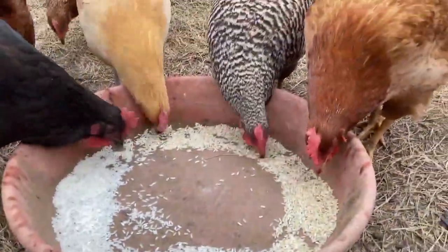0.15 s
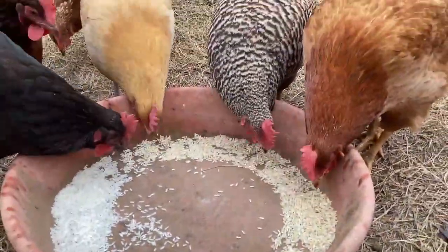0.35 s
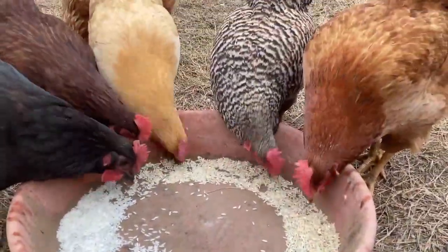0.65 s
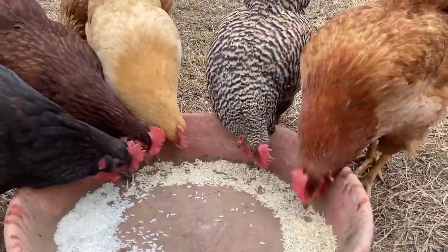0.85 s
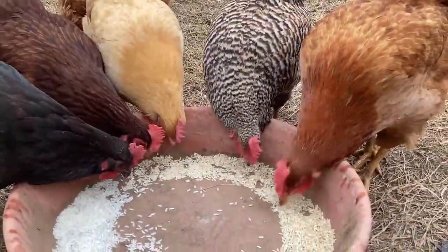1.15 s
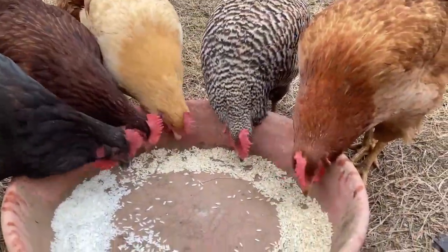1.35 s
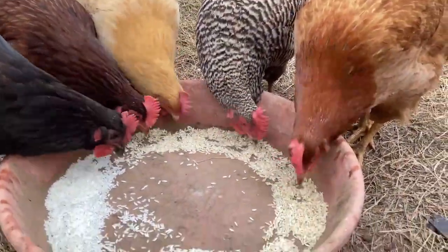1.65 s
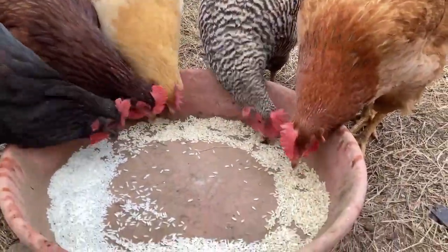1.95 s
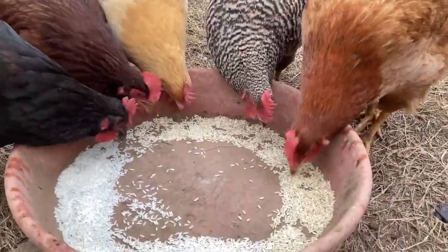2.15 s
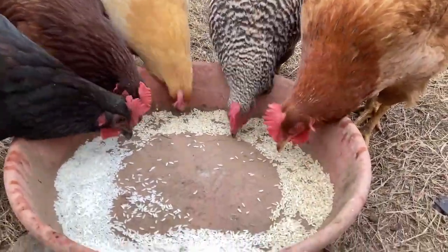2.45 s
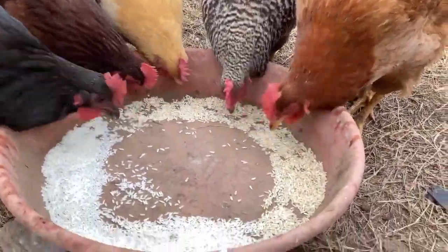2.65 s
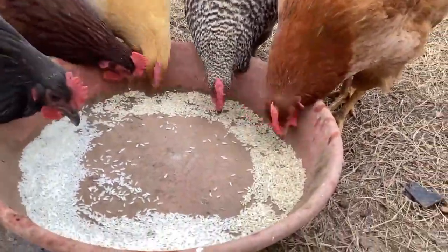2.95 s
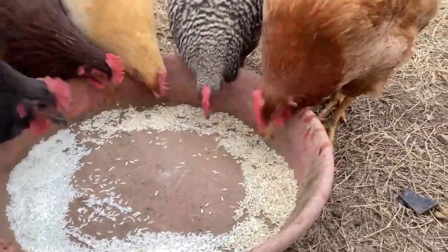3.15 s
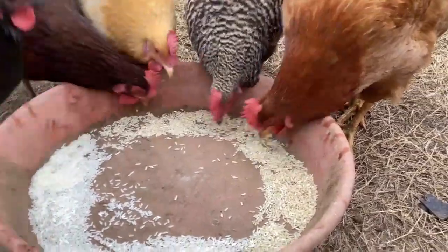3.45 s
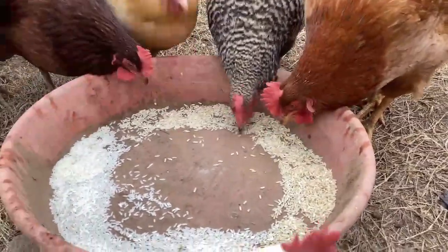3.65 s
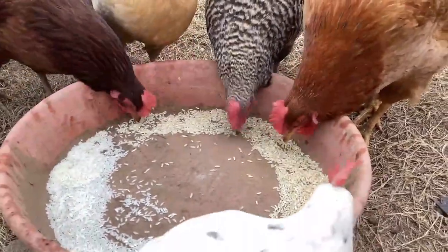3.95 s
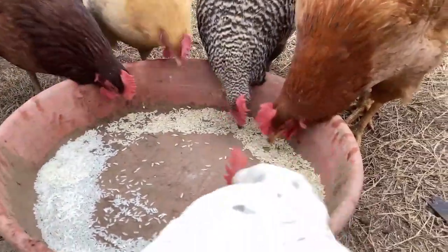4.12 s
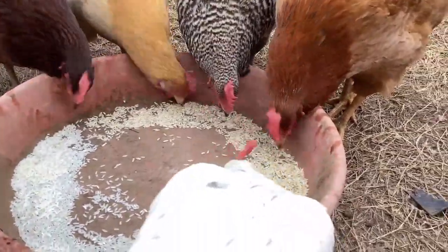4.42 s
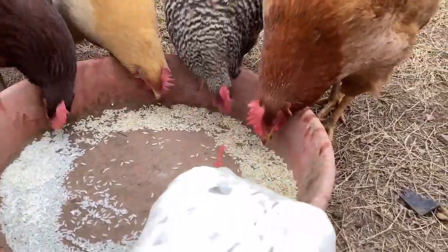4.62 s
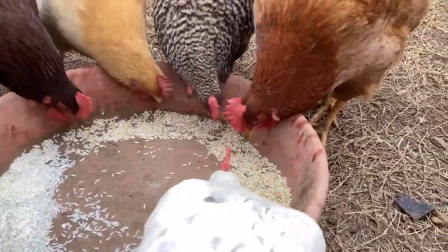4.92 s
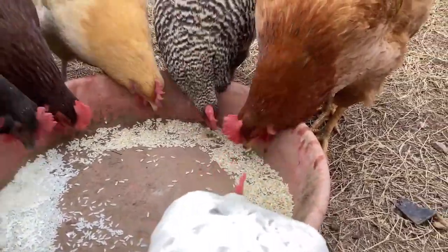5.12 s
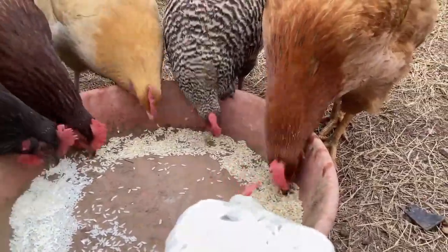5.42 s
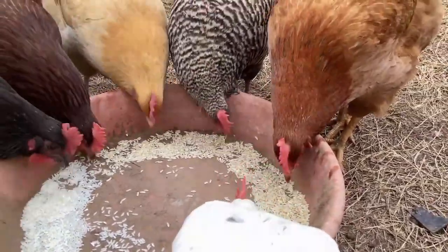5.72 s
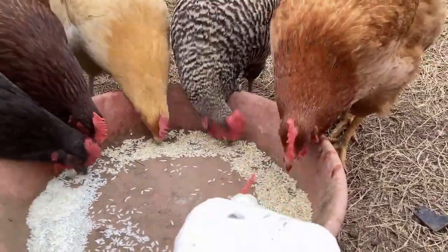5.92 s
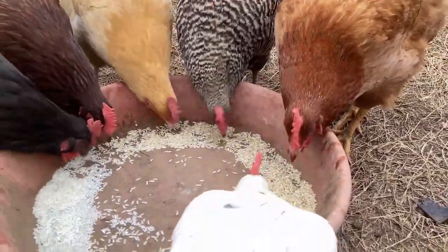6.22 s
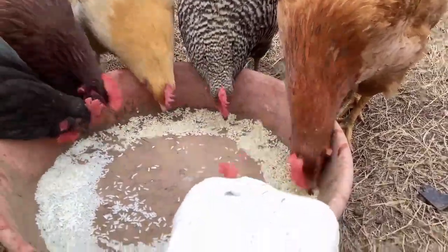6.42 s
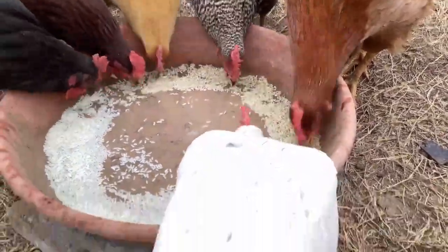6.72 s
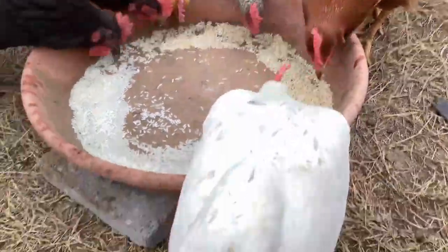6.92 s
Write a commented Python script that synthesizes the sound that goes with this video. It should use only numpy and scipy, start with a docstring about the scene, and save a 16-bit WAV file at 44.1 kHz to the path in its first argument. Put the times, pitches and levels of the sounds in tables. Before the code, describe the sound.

Rapid uneven beak knocks on a thin pan with crisp rice ticking, faint straw rustle and one soft hen murmur, outdoors.

```python
"""Dry rice crunches and a thin pan knocks as hens peck from a wide plastic pan in a backyard, heard from close above.
Each beak drives through the grains and jolts the pan, whose bending waves arrive treble first and end in a low thud.
Kicked grains patter down and loose rice slides back, both as ticking noise; straw and feathers rustle as birds jostle.
One hen murmurs a hoarse gliding tone and a distant bird peeps twice, over a quiet outdoor rumble of shaped noise."""
import sys
import numpy as np
from scipy import signal
from scipy.fft import rfft, irfft, next_fast_len
from scipy.io import wavfile
from scipy.ndimage import uniform_filter1d

SR = 44100
rng = np.random.default_rng(int(sys.argv[2]) if len(sys.argv) > 2 else 0)


def materialize(psi):
    """Save the field psi as 16-bit PCM at rate SR to the path in sys.argv[1].

    A 1-D psi becomes a single channel; in a 2-D psi each row is a channel.
    """
    bounded = np.clip(np.atleast_2d(psi).T, -1, 1)
    quanta = np.round(bounded * 32767).astype(np.int16)
    wavfile.write(sys.argv[1], SR, quanta)


N = 311768
PECK_SIZE = 8192   # samples in the sound of one peck
TIME = np.arange(N) / SR
PECK_TIME = np.arange(PECK_SIZE) / SR
PECK_HZ = np.maximum(np.arange(PECK_SIZE // 2 + 1) * SR / PECK_SIZE, 1)

# Open-air rumble. Each row: frequency in Hz, level in dB per Hz.
YARD_COLOUR = [(35, -36), (80, 6.5), (300, -15), (1200, -22), (15000, -54)]
# Peeps of a distant bird. Each row: start in seconds, length in seconds, starting pitch in Hz, final pitch in Hz.
BIRD_PEEPS = [(0.37, .022, 4050, 4650), (0.383, .028, 4020, 3640)]
# A hen's murmur. Each row: start in seconds, length in seconds, pitch aimed at in Hz, starting level in dB.
HEN_MURMURS = [(0.898, 0.57, 448, -48.5)]
# Breathy rasp in the murmur. Each row: frequency in Hz, level in dB per Hz.
RASP_COLOUR = [(200, -25), (330, 6), (560, -6), (900, -23), (3000, -60)]
# Feet and bodies of the flock moving about. Each row: time in seconds, level in dB.
FLOCK_STIR = [(0, -63), (.9, -59), (2.6, -51), (3.3, -60), (4.9, -55), (5.3, -48.5), (5.8, -55.5),
              (7.07, -49.5)]
# Shuffling feet. Each row: frequency in Hz, level in dB per Hz.
FEET_COLOUR = [(35, -51), (62, 7), (110, 9.5), (190, -2.5), (450, -11.5), (800, -27)]
# Rustling straw and feathers. Each row: frequency in Hz, level in dB per Hz.
STRAW_COLOUR = [(200, 9.5), (450, 0.5), (1300, 4.5), (2000, 0.5), (3500, 0), (6300, -13), (9000, -72)]
# Scuffle after the shove. Each row: frequency in Hz, level in dB per Hz.
SCUFFLE_COLOUR = [(60, -6), (400, 0), (900, -6), (3000, -21), (7000, -36)]
# A trickle of loose rice that swells and thins. Each row: time in seconds, level in dB before the trickle trim.
RICE_TRICKLE = [(0.0, -59), (0.47, -60), (2.15, -61), (2.91, -66.5), (3.37, -63), (4.23, -72), (4.98, -73),
                (5.3, -58), (6.61, -58.5), (7.07, -45)]
# A beak raking through the rice. Each row: middle in seconds, length in seconds, peak level in dB of moving rice.
BEAK_RAKES = [(0.308, 0.11, -53), (0.564, 0.071, -49), (2.03, .2, -63), (2.4, 0.28, -58),
              (3.384, 0.18, -57.5), (3.785, 0.065, -62), (5.088, 0.077, -50.5), (6.948, .1, -48)]
# Flicked grains hitting the pan. Each row: time in seconds, level in dB as energy spread over 10 ms.
FLICKED_GRAINS = [(0.062, -44), (0.298, -45.5), (0.413, -50.5), (0.566, -48), (0.588, -45), (0.975, -45.5),
                  (1.116, -50), (1.42, -49), (1.45, -43), (1.719, -43), (4.919, -54), (4.942, -51),
                  (5.801, -50), (6.158, -52), (6.6, -45)]
# Tone of a flicked grain on the pan. Each row: frequency in Hz, gain in dB.
FLICK_COLOUR = [(600, -16), (1500, -5), (3000, 0), (4500, -2), (6000, -5), (7500, -12), (9500, 1),
                (11500, 2), (13500, -7), (16000, -12)]
# Rice under the far hens. Each row: frequency in Hz, level in dB per Hz.
FAR_RICE_COLOUR = [(2000, -30), (5000, 5), (6500, -4.5), (7500, -4), (9500, -0.5), (11700, 1.5),
                   (13000, -2.5), (14500, -7), (16000, -11)]
# Duller rice. Each row: frequency in Hz, level in dB per Hz.
DULL_RICE_COLOUR = [(2000, -22), (5000, 3.5), (7500, 0), (11000, -3), (16000, -19)]
# Rice crunched by the nearest hen. Each row: frequency in Hz, level in dB per Hz.
NEAR_CRUNCH_COLOUR = [(2000, -4), (4600, 0), (5800, -17.5), (7200, -1.5), (9200, 0), (11500, -1),
                      (12800, -7.5), (16000, -13)]
# Loose rice near the listener. Each row: frequency in Hz, level in dB per Hz.
NEAR_LOOSE_COLOUR = [(1200, -20), (2500, 6), (4600, -6), (5800, -12), (7200, 1.5), (9200, 1.5),
                     (11500, -1.5), (12800, -5), (16000, -9)]
# Click of the far beaks. Each row: frequency in Hz, gain in dB.
FAR_BEAK_COLOUR = [(1000, -8), (1800, -6), (2500, -5.5), (3200, 0), (4000, -5.5), (4600, -12), (5500, -6.5),
                   (6500, -20), (9000, -35.5)]
# Click once the nearest hen joins. Each row: frequency in Hz, gain in dB.
NEAR_BEAK_COLOUR = [(1000, -8), (1800, 0), (2950, 5.5), (3600, -7.5), (4700, -16.5), (5700, -16.5),
                    (9000, -21)]
# Resonances of the pan. Each row: frequency in Hz, width in Hz, lift in dB.
PAN_RESONANCES = [(181, 64, -1), (740, 120, 2), (1270, 150, 3.5), (2140, 500, 5), (2763, 99, 6.5),
                  (3430, 120, 2.5)]
# The pecks. Each row: start in seconds, contact length in seconds, knock level in dB as energy spread over 10 ms,
# weight behind it in dB, depth of rice in dB (both against a usual peck), ring of the struck spot in Hz.
HEN_PECKS = [(0.0798, 0.0021, -49.5, -15, 28.5, 2450), (0.2054, 0.012, -33, 0.5, 4.5, 880),
             (0.2407, 0.011, -24.5, -2.0, -1, 1300), (0.451, 0.014, -41.5, 7.0, 11, 910),
             (0.4914, 0.0069, -27.0, -3, -5, 676), (0.5213, 0.012, -31, -1, 10.5, 1400),
             (0.704, 0.0097, -41.5, 10.5, 8.5, 520), (0.732, 0.0044, -32.5, -9.0, 0.5, 1460),
             (0.7762, 0.012, -22.5, 3.5, 0.0, 1330), (0.8437, 0.016, -30.5, -19, 7.5, 1600),
             (1.0056, 0.015, -41.5, 8.0, 16.0, 530), (1.0338, 0.0073, -31.0, -2, 0, 1260),
             (1.054, 0.01, -31.0, 4.5, 3, 680), (1.231, 0.0094, -30.5, -0.5, -2.5, 617),
             (1.2617, 0.014, -28.5, 0, 3.5, 520), (1.287, 0.012, -30.0, 2.0, 0, 875),
             (1.4922, 0.0098, -29.0, -5.5, -2.5, 1130), (1.5591, 0.016, -30.5, 2.5, 2, 720),
             (1.581, 0.011, -27, -13, 2.5, 1310), (1.7401, 0.0095, -31.0, -4, 4.0, 1630),
             (1.773, 0.014, -43.5, 13.5, 3.0, 550), (1.87, 0.012, -33.5, 6.0, 3.5, 540),
             (1.902, 0.0097, -31.5, 5.5, 5, 1140), (1.993, 0.016, -41.5, -26, 6.5, 1430),
             (2.039, 0.017, -34.5, 10.5, 3.5, 950), (2.128, 0.015, -28.0, 4.0, 1.5, 740),
             (2.234, 0.0085, -34.0, -1.0, 4.5, 680), (2.251, 0.0041, -40.5, -13, 9, 1050),
             (2.3762, 0.0057, -33.5, 4.5, 5, 990), (2.504, 0.0098, -31.5, -0.5, 0.5, 720),
             (2.5538, 0.0043, -32.0, 1.5, -0.5, 1190), (2.603, 0.0093, -31.5, 4.0, 1, 815),
             (2.6298, 0.0063, -31.5, -3.5, -1.5, 616), (2.78, 0.0099, -26.5, -2.5, -1, 860),
             (2.814, 0.013, -38.5, 9, 5.5, 550), (2.864, 0.015, -49.5, 16, 3.0, 2360),
             (2.985, 0.021, -42.5, 11.5, 7.5, 1850), (3.0227, 0.0042, -35, 2.0, -6.5, 524),
             (3.085, 0.015, -28.5, 3.5, -1.0, 1000), (3.1122, 0.0037, -38.5, -8, 12, 1340),
             (3.41, 0.016, -41.5, -3.5, 2.0, 1530), (3.4624, 0.013, -40.0, -2.5, 9, 1150),
             (3.562, 0.0091, -33.5, 4.5, 3.0, 800), (3.7076, 0.011, -30.0, -1.5, -1.5, 2120),
             (3.872, 0.0098, -41.5, -10, -0.5, 2180), (3.9976, 0.0066, -28.5, -3.5, -7.5, 1010),
             (4.1331, 0.011, -31.5, -6.5, -7.5, 900), (4.275, 0.0097, -37, -13.5, -2.5, 1210),
             (4.3463, 0.0059, -26.5, -3.0, -0.5, 850), (4.3647, 0.011, -27.5, -2.5, -6, 520),
             (4.43, 0.0063, -41.5, -6, -6.0, 1240), (4.4788, 0.0038, -33.5, 3.5, -2, 880),
             (4.6058, 0.008, -37, -6, 0, 2030), (4.6385, 0.012, -34.5, -2, 5.0, 1170),
             (4.735, 0.006, -43.5, -7, -3, 940), (4.788, 0.0086, -30.0, -3, -22, 570),
             (4.846, 0.014, -37, -8.0, 2.0, 1600), (4.8755, 0.0035, -41, -22, -1, 1760),
             (4.936, 0.015, -44.0, 9, 7, 2110), (5.027, 0.015, -39, 4.5, -5.0, 940),
             (5.122, 0.018, -34, -0.5, 2.5, 3050), (5.2064, 0.013, -30.0, -3.5, -1.5, 1070),
             (5.37, 0.015, -24.5, 1, 8.5, 3100), (5.434, 0.0084, -34.5, 6.0, 0, 1760),
             (5.446, 0.0085, -24.0, -7, -2.0, 3000), (5.4694, 0.011, -21.5, -10.5, -1.5, 1200),
             (5.64, 0.0092, -27.5, -5, -12.0, 3000), (5.6512, 0.0079, -21.0, -5, 1.5, 1310),
             (5.681, 0.0059, -27, -2.5, 0, 1200), (5.7007, 0.012, -30.5, -5, 4.5, 1590),
             (5.731, 0.0039, -40.5, -14, 17.5, 1480), (5.763, 0.0089, -28.0, -2.5, 2, 694),
             (5.8329, 0.0048, -26.0, -9.5, -14, 577), (5.972, 0.023, -24.5, -3.5, 6.5, 1240),
             (6.0276, 0.0048, -47, 0.0, 20, 1340), (6.072, 0.016, -23.0, -3, -3.5, 1210),
             (6.2408, 0.015, -26.0, -1.5, 5.5, 610), (6.3037, 0.011, -34.5, -1.5, 7, 674),
             (6.394, 0.0085, -27.0, -4, -4.5, 1340), (6.476, 0.013, -33.0, -5, 6.5, 940),
             (6.5244, 0.012, -24, -10, -4.5, 2470), (6.5396, 0.011, -23.0, -3.5, 0.5, 2960),
             (6.7426, 0.012, -25.0, -1, -1.5, 760), (6.804, 0.012, -33.0, -12, 5, 990),
             (6.8858, 0.0057, -28, -9.0, -7, 2950), (6.9114, 0.008, -19.5, -7.5, -1.5, 740),
             (6.9454, 0.018, -36.0, 1.5, 14.0, 1580), (7.007, 0.004, -32.0, -8, -2, 1500),
             (7.056, 0.0099, -22, -4, -5.5, 2870)]

DULL_FROM_S, NEAR_FROM_S = 3.2, 5.0   # the rice sounds duller; then the nearest hen, close below us, joins in

YARD_DB, PEEP_DB = -64, -56
MURMUR_ATTACK_S, MURMUR_RELEASE_S, MURMUR_FADE_DB_PER_S = 0.029, 0.053, 8
MURMUR_SCOOP_HZ, MURMUR_SCOOP_S, MURMUR_SAG_HZ_PER_S = 130, .09, 250   # scoops up, then sinks
FLICK_T60_S = 0.0073

TRICKLE_TRIM_DB = -5.5
SPILL_DB, SPILL_FALL_DB_PER_S = -15.5, 214   # rice sliding back after a peck, against its crunch
STRAW_DB, STRAW_SHARE = 4, 0.52   # the rustle follows the rice by this share, the feet by the rest
SHIELDED_DB = -3   # the nearest hen's body screens the top of the rustle
# One hen shoves in against the pan: a bump, then a scuffle as the others give way.
SHOVE_S, SHOVE_DB, SHOVE_RISE_DB_PER_S, SHOVE_FALL_DB_PER_S = 5.37, -32.5, 230, 350
SCUFFLE_DB, SCUFFLE_FALL_DB_PER_S = -37, 102

THUD_DB, CLICK_DB, CRUNCH_DB = -3.5, -7.5, -12.8   # of a usual peck, against its knock
KICKED_DB = -13.5   # grains that a peck throws up, against its crunch
CLICK_SHARE = 0.51   # grains cracking under the beak add this share of the rice's depth to the click
LIGHT_CLICK_SHARE = 0.064   # a light, quick peck clicks more, by this share of the weight it lacks
KNOCK_HZ, KNOCK_OCTAVES_PER_DB = 994, -0.04   # heavier pecks knock lower
STIFF_CLICK_DB, STIFF_PULL = .8, .04   # per octave of spot pitch: louder click in dB, higher knock in octaves
SPOT_LIFT_DB, SPOT_WIDTH_HZ = 7.5, 330   # the struck spot rings at its own pitch

CUTOFF_HZ = 15850


def from_db(db):
    """Decibels to gain."""
    return 10 ** (np.asarray(db) / 20)


def rms_one(x):
    """Scale to an rms of 1."""
    return x / np.sqrt(np.mean(x ** 2) + 1e-20)


def level_curve(rows):
    """Level in dB at every sample, in straight lines between the rows."""
    s, db = np.transpose(rows)
    return np.interp(TIME, s, db)


def gain_at(points, hz):
    """Gain of a spectrum at the given frequencies."""
    f, db = np.transpose(points)
    return from_db(np.interp(np.log(np.maximum(hz, 1)), np.log(f), db))


def coloured(x, points):
    """A long sound shaped by a spectrum; rms 1."""
    size = next_fast_len(N)
    hz = np.arange(size // 2 + 1) * SR / size
    return rms_one(irfft(rfft(x, size) * gain_at(points, hz), size)[:N])


def hiss_coloured(points):
    """Steady noise shaped by a spectrum; rms 1."""
    return coloured(rng.standard_normal(N), points)


def drift(rate):
    """Slow chance: random values of spread 1, drawn at this rate per second and joined by lines."""
    knots = rng.standard_normal(int(N / SR * rate) + 2)
    return np.interp(TIME * rate, np.arange(len(knots)), knots)


def swell(s, rise_db_per_s, fall_db_per_s):
    """Gain that rises to 1 at time s and dies away."""
    drop_db = np.maximum((s - TIME) * rise_db_per_s, (TIME - s) * fall_db_per_s)
    return from_db(-np.clip(drop_db, 0, 200))


def add(out, s, sound):
    """Mix a sound in from time s."""
    at = max(round(s * SR), 0)
    out[at:at + len(sound)] += sound[:max(N - at, 0)]


def causal(gain):
    """Minimum-phase response with this gain: nothing sounds before the blow."""
    cepstrum = irfft(np.log(gain + 1e-5))
    cepstrum[1:PECK_SIZE // 2] *= 2
    cepstrum[PECK_SIZE // 2 + 1:] = 0
    return np.exp(rfft(cepstrum))


def passband(low_hz, high_hz, order):
    """Gain of a smooth band-pass."""
    below = 1 + (low_hz / PECK_HZ) ** (2 * order)
    above = 1 + (PECK_HZ / high_hz) ** (2 * order)
    return (below * above) ** -.5


def resonance_db(hz, width_hz, lift_db):
    """Lift in dB of a resonance, halved at half its width from the centre."""
    return lift_db / (1 + (2 * (PECK_HZ - hz) / width_hz) ** 2)


def shading(spread_db):
    """A chance colour for each spot and beak: random peaks and dips a fifth of an octave apart."""
    return from_db(spread_db * np.interp(5 * np.log2(PECK_HZ), np.arange(75), rng.standard_normal(75)))


def burst(spectrum, db):
    """The waveform of a spectrum, dying out at its end, with the energy of 10 ms at this level."""
    fade = np.interp(np.arange(PECK_SIZE) / PECK_SIZE, [.7, .92], [1, 0])
    wave = irfft(spectrum) * fade
    return from_db(db) * wave * np.sqrt(SR / 100 / (np.sum(wave ** 2) + 1e-20))


def outdoor_rumble():
    """The quiet yard: steady noise weighted to the lows."""
    return from_db(YARD_DB) * hiss_coloured(YARD_COLOUR)


def bird_peeps():
    """A small bird far off: faint sine tones gliding from one pitch to another."""
    out = np.zeros(N)
    for s, length, start_hz, end_hz in BIRD_PEEPS:
        hz = np.linspace(start_hz, end_hz, int(length * SR))
        tone = np.sin(2 * np.pi * np.cumsum(hz) / SR)
        add(out, s, from_db(PEEP_DB) * np.hanning(len(hz)) * tone)
    return out


def hen_murmur():
    """A hen's soft voice: a hoarse, unsteady tone with traces of its overtone and a breathy rasp."""
    out = np.zeros(N)
    waver = 1 + .045 * drift(120)
    hoarse = from_db(3 * drift(70))
    rasp = from_db(-7) * hiss_coloured(RASP_COLOUR)
    for s, length, aim_hz, db in HEN_MURMURS:
        age = np.clip(TIME - s, 0, length)
        envelope = np.minimum(1, np.minimum(age / MURMUR_ATTACK_S, (length - age) / MURMUR_RELEASE_S))
        scoop = MURMUR_SCOOP_HZ * np.exp(-age / MURMUR_SCOOP_S)
        hz = (aim_hz - MURMUR_SAG_HZ_PER_S * age - scoop) * waver
        phase = 2 * np.pi * np.cumsum(hz) / SR
        voice = np.sin(phase) + 0.2 * np.sin(2 * phase) + rasp
        out += envelope * from_db(db - MURMUR_FADE_DB_PER_S * age) * hoarse * voice
    return out


def grainy(per_s, spread_db, hiss):
    """Random ticks of uneven size over a fine hiss, coming in clumps a few milliseconds long."""
    sizes = from_db(spread_db * np.minimum(rng.exponential(1, N), 2)) * rng.choice([-1, 1], N)
    ticks = rms_one(sizes * (rng.random(N) < per_s / SR)) + hiss * rng.standard_normal(N)
    return ticks * from_db(spread_db * np.clip(drift(260), -2, 2))


def lone_ticks(per_s, t60):
    """Many times a second, at random, a faint grain rolls over and rattles for a moment; rms 1."""
    flicks = (rng.random(N) < per_s / SR) * rng.uniform(.4, 1, N) ** 2
    dying = signal.lfilter([1], [1, -from_db(-60 / (t60 * SR))], flicks + 1e-18)
    return rms_one(dying * rng.standard_normal(N))


def screened(x):
    """Straw sounds duller once the nearest hen stands over it: her body holds back the treble."""
    dull = signal.sosfiltfilt(signal.butter(3, 3600, fs=SR, output="sos"), x)
    return np.where(TIME > NEAR_FROM_S, from_db(SHIELDED_DB) * (x - dull) + dull, x)


def rice_toned(x):
    """Grain ticks take the colour of the far rice, duller for a while, then that of the near rice."""
    near, dull, far = [coloured(x, c) for c in (NEAR_LOOSE_COLOUR, DULL_RICE_COLOUR, FAR_RICE_COLOUR)]
    return np.select([TIME > NEAR_FROM_S, TIME > DULL_FROM_S], [near, dull], far)


def sliding_level():
    """Moving rice in dB: a trickle that swells and thins, the rakes, and a spill that settles after every peck."""
    power = from_db(level_curve(RICE_TRICKLE) + TRICKLE_TRIM_DB) ** 2
    age = np.arange(PECK_SIZE * 2) / SR
    for s, length, knock_db, _, depth_db, _ in HEN_PECKS:
        spill_db = knock_db + CRUNCH_DB + depth_db + SPILL_DB - SPILL_FALL_DB_PER_S * age
        add(power, s + length, from_db(spill_db) ** 2)
    for s, length, db in BEAK_RAKES:
        power += from_db(db) ** 2 * np.exp(-(2 * np.sqrt(2) * (TIME - s) / length) ** 2)
    return 10 * np.log10(power)


def flock():
    """Feet shuffle; straw and feathers rustle with the bustle that moves the loose rice; one hen shoves in."""
    feet_db = level_curve(FLOCK_STIR)
    rice_db = sliding_level()
    straw_db = STRAW_DB + STRAW_SHARE * rice_db + (1 - STRAW_SHARE) * feet_db
    feet = hiss_coloured(FEET_COLOUR) * from_db(2 * drift(25))
    straw = coloured(grainy(per_s=1500, spread_db=3, hiss=.6), STRAW_COLOUR)
    straw = screened(straw) * from_db(3 * drift(30))
    rice = rice_toned(grainy(per_s=2000, spread_db=4.5, hiss=.2)) * from_db(4.5 * drift(45))
    rolling = rice_toned(lone_ticks(per_s=28, t60=0.01))
    stirring = feet * from_db(feet_db) + straw * from_db(straw_db)
    loose_rice = rice * from_db(rice_db - 2.5) + rolling * from_db(rice_db - 1)
    bump_gain = from_db(SHOVE_DB) * swell(SHOVE_S, SHOVE_RISE_DB_PER_S, SHOVE_FALL_DB_PER_S)
    scuffle_gain = from_db(SCUFFLE_DB) * swell(SHOVE_S, SHOVE_RISE_DB_PER_S, SCUFFLE_FALL_DB_PER_S)
    scuffle = coloured(grainy(per_s=700, spread_db=3, hiss=.5), SCUFFLE_COLOUR) * from_db(2.5 * drift(90))
    shove = np.maximum(bump_gain, scuffle_gain) * (feet + scuffle)
    return stirring + loose_rice + shove


def flicked_grains():
    """Single grains hit the pan with a short dying rattle, each with a colour of its own."""
    out = np.zeros(N)
    dying = from_db(-60 * PECK_TIME / FLICK_T60_S)
    for s, db in FLICKED_GRAINS:
        rattle = rfft(rng.standard_normal(PECK_SIZE) * dying)
        colour = causal(gain_at(FLICK_COLOUR, PECK_HZ) * shading(spread_db=2.0))
        add(out, s, burst(rattle * colour, db))
    return out


def contacts(length, per_s, spread_db, first):
    """Spectrum of a peck's force: a first touch, then uneven jolts that grow as the beak drives in."""
    born = (rng.random(PECK_SIZE) < per_s / SR) & (PECK_TIME < length)
    sizes = from_db(spread_db * np.clip(rng.standard_normal(PECK_SIZE), -2, 2)) * rng.choice([-1, 1], PECK_SIZE)
    force = born * sizes * (1 + PECK_TIME / length) / 2
    force[0] = first
    force[int(length * rng.uniform(.3, .6) * SR)] += 1.5   # the beak meets the bottom
    return rfft(force)


def evened(force):
    """A force spectrum with its broad chance peaks and dips mostly levelled, so that the pan sets the colour."""
    power = uniform_filter1d(np.abs(force) ** 2, size=71)
    return force * causal((power / power.mean()) ** -.4)


def scatter(db, t60, per_s):
    """Response of a direct sound followed by a dying swarm of small copies."""
    born = (rng.random(PECK_SIZE) < per_s / SR) * (PECK_TIME > .002)
    swarm = born * rng.standard_normal(PECK_SIZE) * from_db(-60 * PECK_TIME / t60)
    return 1 + from_db(db) * rfft(swarm) / np.sqrt(np.sum(swarm ** 2) + 1e-12)


def bending(echo_db, loss_hz):
    """Bending waves travel with the root of frequency: the lows come late, later still back from the rim."""
    lag = .016 * rng.uniform(.7, 1.2) * np.sqrt(200 / np.minimum(PECK_HZ, 900))   # seconds
    # phase is the running sum of delay over frequency
    direct, travel = [2 * np.pi * np.cumsum(d) * SR / PECK_SIZE for d in (lag - lag[-1], lag)]
    detours = rng.uniform([.15, .3, .6, 1.3], [.3, .6, 1.3, 2.2])   # rim paths, against the direct one
    echoes = sum(np.exp(-d * (1j * travel + PECK_HZ / loss_hz)) * rng.choice([-1, 1]) for d in detours)
    return np.exp(-1j * direct) * (1 + from_db(echo_db) * echoes)


def patter(count, mean_s):
    """Spectrum of a few kicked grains landing one after another, each with a short rattle."""
    landings = np.zeros(PECK_SIZE)
    at = np.clip(rng.gamma(2, mean_s / 2, count) * SR, 0, PECK_SIZE * .9).astype(int)
    landings[at] = rng.standard_normal(count)
    rattle = rng.standard_normal(PECK_SIZE) * from_db(-60 * PECK_TIME / .006)
    return rfft(landings) * rfft(rattle)


def rice_crunch(length, crunch_db, colour):
    """Grains crack and grind under the beak, and a few fly up and patter down."""
    rice = causal(gain_at(colour, PECK_HZ) * shading(2.5))
    grains = contacts(length * 1.25, per_s=1100, spread_db=6.0, first=.8)
    crunch = burst(grains * rice * scatter(db=-9, t60=.025, per_s=1200), crunch_db)
    kicked = burst(patter(count=5, mean_s=.05) * rice, crunch_db + KICKED_DB)
    return crunch + kicked


def pecking():
    """Every peck drives the pan (thud and knock), clicks the beak, crunches the rice and kicks up grains."""
    out = np.zeros(N)
    body = from_db(sum(resonance_db(*row) for row in PAN_RESONANCES))
    thud = causal(body * passband(low_hz=99.0, high_hz=433, order=4) * (1 + (PECK_HZ / 230) ** 2) ** -.5)
    for s, length, knock_db, weight_db, depth_db, spot_hz in HEN_PECKS:
        stiffness = np.log2(spot_hz / KNOCK_HZ)   # a stiffer spot rings higher; octaves
        thud_db = knock_db + THUD_DB + weight_db
        click_db = knock_db + CLICK_DB + CLICK_SHARE * max(depth_db, 0)
        click_db += STIFF_CLICK_DB * stiffness - LIGHT_CLICK_SHARE * weight_db
        crunch_db = knock_db + CRUNCH_DB + depth_db
        pitch = KNOCK_HZ * 2 ** (KNOCK_OCTAVES_PER_DB * weight_db + STIFF_PULL * stiffness)
        if s > NEAR_FROM_S:
            beak_colour, rice_colour = NEAR_BEAK_COLOUR, NEAR_CRUNCH_COLOUR
        else:
            beak_colour = FAR_BEAK_COLOUR
            rice_colour = DULL_RICE_COLOUR if s > DULL_FROM_S else FAR_RICE_COLOUR
        spot = body * from_db(resonance_db(spot_hz, SPOT_WIDTH_HZ, SPOT_LIFT_DB))
        beak = causal(spot * gain_at(beak_colour, PECK_HZ) * shading(1.5))
        knock = causal(spot * passband(low_hz=pitch * .52, high_hz=pitch * 1.5, order=3))
        # deep rice cushions the first touch; on the bare pan it is a harder jolt
        first = from_db(np.clip(.6 * (knock_db - crunch_db - 13), -4, 6))
        force = evened(contacts(length, per_s=900, spread_db=3.5, first=first))
        flex = force * bending(echo_db=-10, loss_hz=2200)
        low = burst(flex * thud * scatter(db=-14.0, t60=0.42, per_s=540), thud_db)
        mid = burst(flex * knock * scatter(db=-16, t60=.19, per_s=2500), knock_db)
        high = burst(flex * beak * scatter(db=-12, t60=.14, per_s=1000), click_db)
        add(out, s, low + mid + high + rice_crunch(length, crunch_db, rice_colour))
    return out


def scene():
    """Pecks, grains, flock and voices in the open air, as one channel."""
    background = outdoor_rumble() + bird_peeps() + hen_murmur()
    return (background + flock() + flicked_grains() + pecking())[None]


def record(dry):
    """The small microphone drops the deep bass; the top is cut."""
    thin = signal.sosfilt(signal.butter(5, 48, "high", fs=SR, output="sos"), dry)
    return signal.sosfilt(signal.ellip(10, .2, 80, CUTOFF_HZ, fs=SR, output="sos"), thin)


dry = scene()
out = record(dry)
materialize(out)
```